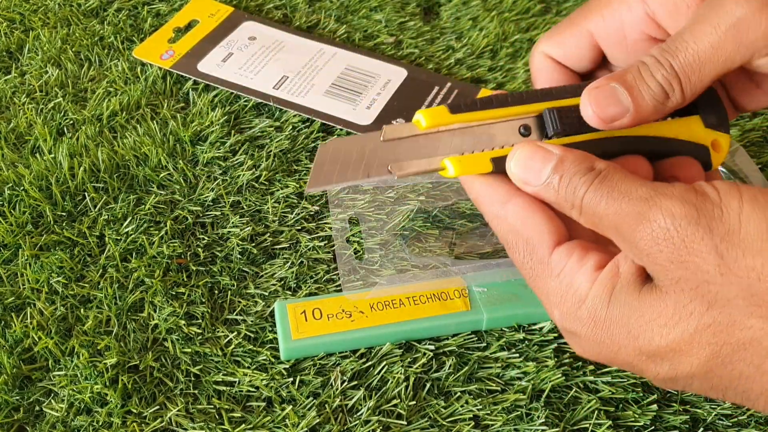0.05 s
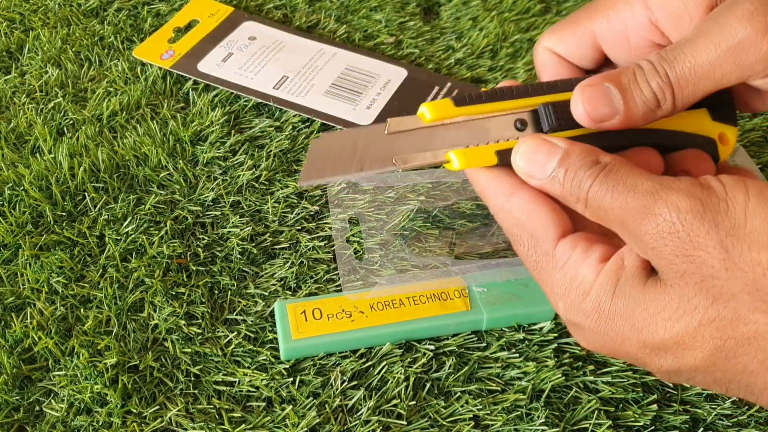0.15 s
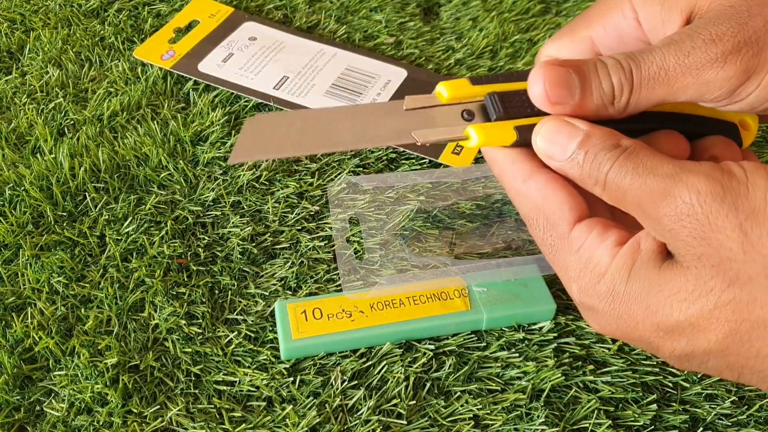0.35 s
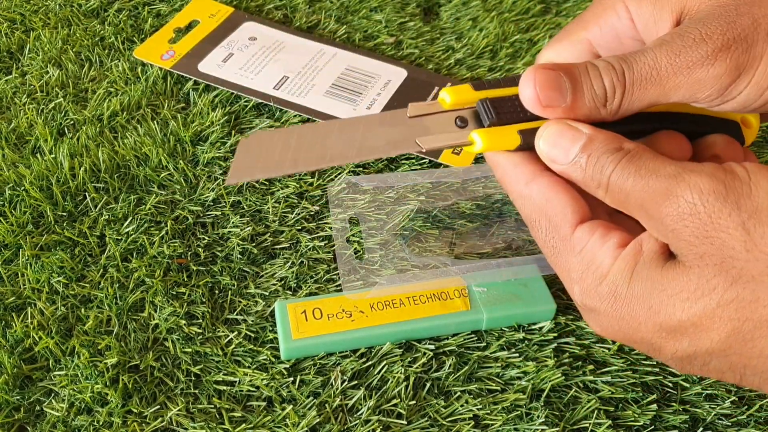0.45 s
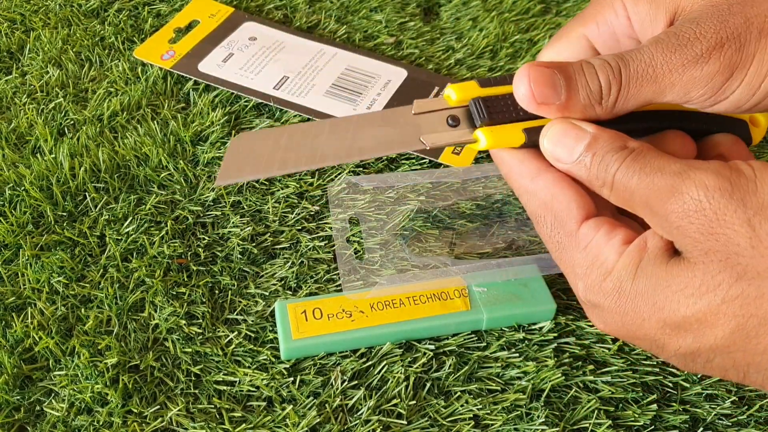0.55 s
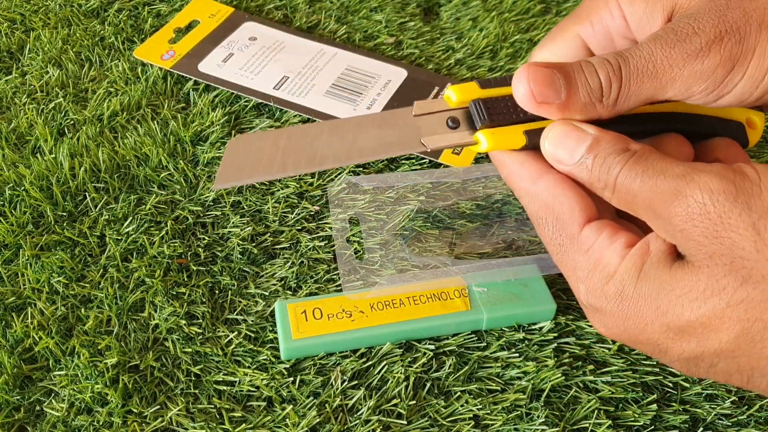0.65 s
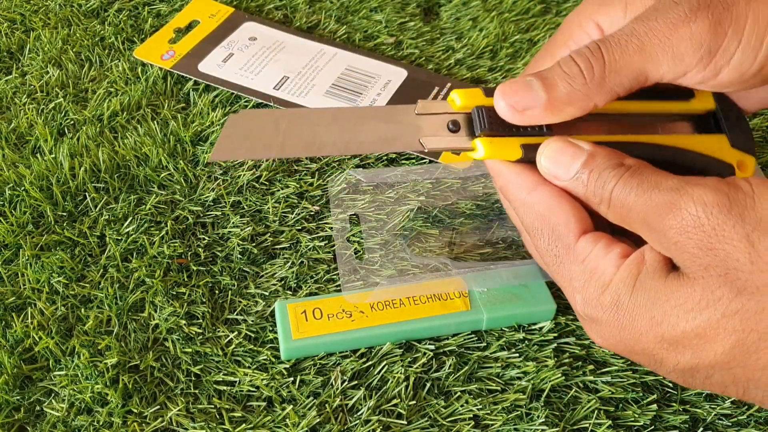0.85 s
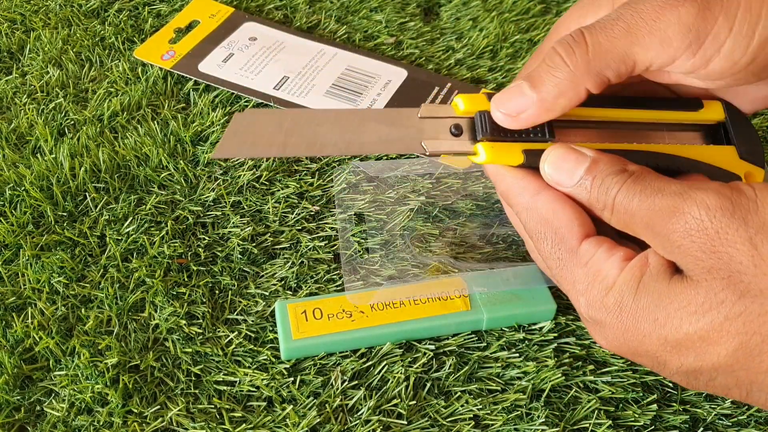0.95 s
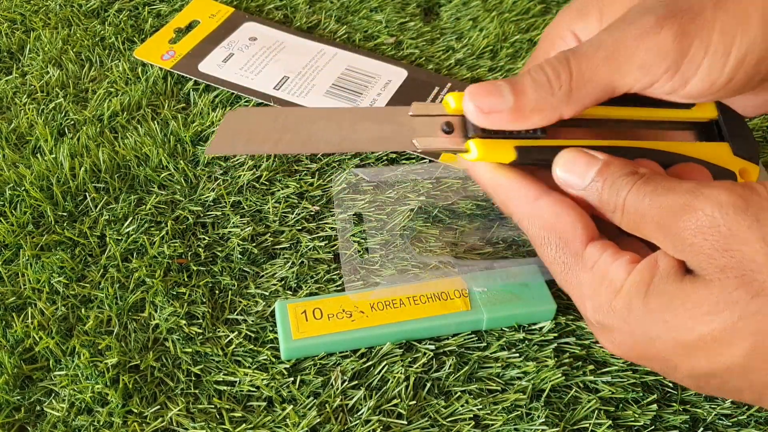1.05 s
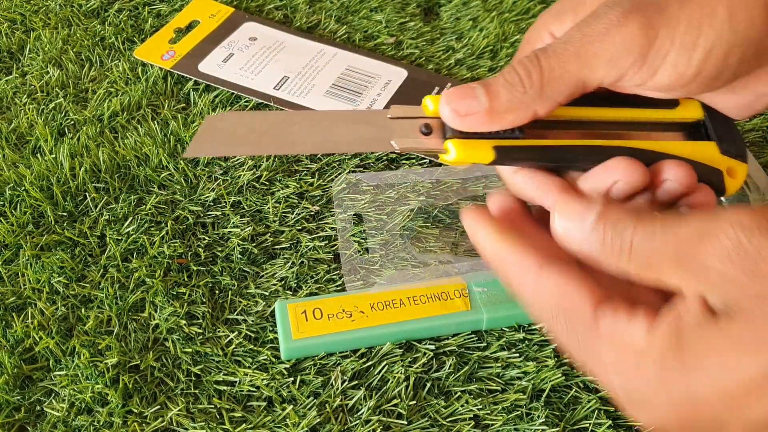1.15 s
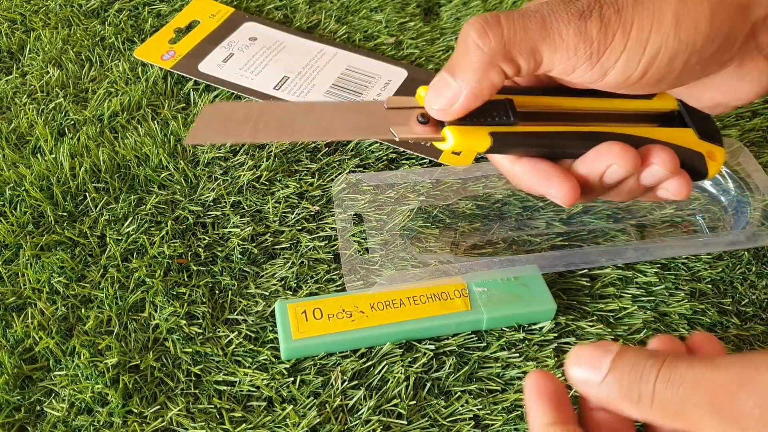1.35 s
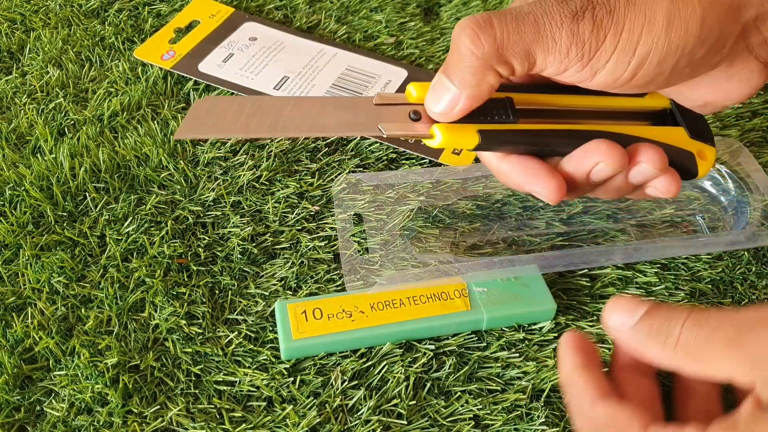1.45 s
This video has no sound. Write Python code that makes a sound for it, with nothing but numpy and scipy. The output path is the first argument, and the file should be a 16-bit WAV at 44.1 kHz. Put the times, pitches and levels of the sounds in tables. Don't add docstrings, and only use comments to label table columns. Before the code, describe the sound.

A utility knife is clicked open close to a small stereo microphone outdoors. After near quiet with a very faint falling bird whistle, ten bright metallic ratchet snaps run from 0.21 to 0.57 seconds, densest near 0.3, then spacing out, with thin blade scraping and hollow plastic knocks. Small rattles end by 0.62. Faint hand rustle and finger taps follow from 0.95, a distant hoot at 1.15, over low traffic rumble.

```python
import sys
import numpy as np
from scipy import signal
from scipy.fft import rfft, irfft, next_fast_len
from scipy.io import wavfile
from scipy.ndimage import uniform_filter1d, map_coordinates

SR = 44100
rng = np.random.default_rng(int(sys.argv[2]) if len(sys.argv) > 2 else 0)


def pcm_store(signal):
    levels = np.round(np.clip(np.atleast_2d(signal), -1, 1) * 32767)
    wavfile.write(sys.argv[1], SR, levels.astype(np.int16).T)


def gain_from_db(level_db):
    decades = np.asarray(level_db, float) / 20
    return 10 ** decades


N = 66150
T = np.arange(N) / SR
KNIFE_LAG_S = 0.000154
TOP_HZ = 16050


def unit(x):
    return x / np.sqrt(np.mean(x ** 2) + 1e-20)


def along(points, hz):
    f, v = np.transpose(points)
    return np.interp(np.log(hz + 1), np.log(f + 1), v)


def curves(rows):
    s, *cols = np.transpose(rows)
    return [np.interp(T, s, c) for c in cols]


def wobble(rate):
    return map_coordinates(rng.standard_normal(int(N * rate / SR) + 4), [T * rate])


def decay(since, t60):
    return (since >= 0) * gain_from_db(-60 * np.clip(since, 0, None) / t60)


def filtered(x, response):
    m = next_fast_len(N + SR // 2)
    return irfft(rfft(x, m) * response(np.fft.rfftfreq(m, 1 / SR)), m)[..., :N]


def lagged(x, lag_s):
    return filtered(x, lambda f: np.exp(-1j * np.pi * f * lag_s * np.array([[1], [-1]])))


def modes(table, f):
    total = 0
    for k, (centre, width, db) in enumerate(table):
        total = total + (-1) ** k * gain_from_db(db) * 1j * f * width / (centre ** 2 - f ** 2 + 1j * f * width)
    return total


def pair(own, spiky_db, rate):
    z = rng.standard_normal((3, N))
    return unit((z[0] + own * z[1:]) * gain_from_db(spiky_db * wobble(rate)))


def gain_patches(x, segment, size_hz, size_time, depth_db):
    z = signal.stft(x, nperseg=segment)[2]
    field = uniform_filter1d(rng.standard_normal(z.shape[1:]), size=size_hz, axis=0)
    field = uniform_filter1d(field, size=size_time, axis=1)
    return signal.istft(z * gain_from_db(depth_db * unit(field)), nperseg=segment)[1][:, :N]


# (frequency [Hz], width [Hz], level [dB])
BLADE_MODES = [(3250, 130, -6.5), (4300, 300, 11), (7360, 190, -7), (8912, 74, 16), (9890, 480, 3),
               (11220, 80, 12), (11950, 140, 1), (12830, 280, 12), (14060, 100, 8.5), (14160, 130, 7),
               (14050, 72, -5.5), (15400, 600, 15.5)]
# (frequency [Hz], left over right [dB])
KNIFE_BALANCE = [(1000, -6), (5000, -10), (8000, -8), (12000, 1.5), (16000, -8)]


def steel(x, colour, ring_db):
    side = np.array([[.5], [-.5]])
    shape = lambda f: gain_from_db(along(colour, f)) * (1 + gain_from_db(ring_db) * modes(BLADE_MODES, f))
    norm = np.sqrt(np.mean(abs(shape(np.linspace(0, SR / 2, num=4000))) ** 2))
    return filtered(x, lambda f: shape(f) / norm * gain_from_db(side * along(KNIFE_BALANCE, f)))


# (time [s], peak [dB], handle knock over it [dB], scrape after it [dB], contact [ms])
SNAPS_ON_TEETH = [
    (0.2114, -18.5, -21.5, -39, 1.58),
    (0.253, -16.5, -22, -33, 0.6),
    (0.2802, -11, -29, -39.5, 0.49),
    (0.2969, -14, -35.5, -44.5, 0.54),
    (0.3089, -17.5, -31, -46, 0.75),
    (0.3274, -15.5, -34.5, -40.5, 0.49),
    (0.3573, -11.5, -12, -36, 0.62),
    (0.3979, -14, -15.5, -48, 0.63),
    (0.4615, -12.5, -28.5, -42.5, 0.61),
    (0.5696, -13, -23, -39.5, 0.53),
]
# (frequency [Hz], level [dB])
SNAP_TONE = [(880, -44), (1500, -20.5), (5000, -9), (6110, -16.5), (7100, -13), (9220, -6), (12300, 2),
             (15400, -8), (16500, -26.5)]
# (frequency [Hz], width [Hz], level [dB])
HANDLE_MODES = [(1200, 350, -8.5), (1730, 200, 3.5), (2540, 260, -1.5)]


def snaps():
    steel_grit = pair(own=1, spiky_db=4.5, rate=2800)
    handle_grit = pair(own=0.28, spiky_db=-2, rate=5500)
    body = lambda f: modes(HANDLE_MODES, f) / (1 + (1000 / (f + 1)) ** 4)
    heard_steel = unit(lagged(steel(steel_grit, SNAP_TONE, ring_db=-9.5), KNIFE_LAG_S).sum(axis=0))
    heard_handle = unit(filtered(handle_grit[1], body))
    rattle, knock = np.zeros(N), np.zeros(N)
    for s, db, knock_db, _, ms in SNAPS_ON_TEETH:
        u = np.clip(T - s, 0, None) / (ms / 1000)
        burst = u ** 2 * np.exp(1.5 - 1.498 * u ** 0.96)
        even = lambda grit: np.linalg.norm(burst) / np.linalg.norm(burst * grit)
        lead_in = gain_from_db(-21) * decay(T - s + .003, t60=0.014)
        rattle += gain_from_db(db - 3.5) * (burst * even(heard_steel) + lead_in)
        knock += gain_from_db(db + knock_db + 12.5) * burst * even(heard_handle)
    blade = steel(rattle * steel_grit, SNAP_TONE, ring_db=-5.0)
    handle = filtered(knock * handle_grit, body) * gain_from_db([[-4], [4]])
    return lagged(blade + handle, KNIFE_LAG_S)


# (time [s], level [dB])
THUMB_PUSH = [(.178, -76.5), (.188, -56), (.21, -43), (.33, -42.5), (.44, -47), (.515, -52.5), (.54, -72),
              (.575, -48), (.625, -47), (.66, -74), (.7, -79)]
# (frequency [Hz], level [dB])
SCRAPE_TONE = [(530, -53.5), (900, -20), (1250, -9), (1600, -3.5), (2100, -8), (3920, -9.5), (7300, -15),
               (8660, -10.5), (11600, -6), (15500, -14), (16500, -32)]


def scrape():
    hold_s, t60_s, stick_db, stick_s = 0.0057, 0.16, -9, .006
    slide, rough_db = gain_from_db(curves(THUMB_PUSH)[0]), 1.0 * wobble(120)
    for s, _, _, scrape_db, _ in SNAPS_ON_TEETH:
        fall = gain_from_db(-60 * (T - s - hold_s).clip(-1, 1) / t60_s)
        slide = slide + gain_from_db(scrape_db) * (T > s) * np.minimum(1, fall)
        rough_db += stick_db * (T < s) * np.exp(-((T - s) / stick_s) ** 2)
    grit = pair(own=1, spiky_db=0.5, rate=2000)
    grain = unit(gain_patches(grit, segment=128, size_hz=3, size_time=6, depth_db=3.2))
    rub = slide * gain_from_db(rough_db) * grain
    early = 1 / (1 + np.exp(((T - .44) / 0.02).clip(-30, 30)))
    out = steel(rub * early, SCRAPE_TONE, ring_db=-3.0) + steel(rub * (1 - early), SCRAPE_TONE, ring_db=-2.5)
    return lagged(filtered(out, lambda f: 1 / (1 + (f / TOP_HZ) ** 120)), KNIFE_LAG_S)


# (time [s], level [dB], pitch [Hz])
HANDLE_THUMPS = [(.2131, -25, 1250), (.2133, -25, 1600), (.2536, -27, 1750), (.2812, -31, 1600),
                 (.3581, -16, 1650), (.3579, -33, 850), (.361, -27, 1700), (.399, -24, 1720),
                 (.4625, -33, 1150), (.5701, -28, 1450), (.596, -38, 1750)]


def thumps():
    out = np.zeros(N)
    for s, db, hz in HANDLE_THUMPS:
        t = np.clip(T - s, 0, None)
        swell = 1 - np.exp(-t / .0004)
        out += gain_from_db(db) * swell * decay(t, t60=.009) * np.sin(2 * np.pi * hz * t)
    out = filtered(out, lambda f: (1j * f / (700 + 1j * f)) ** 2)
    return lagged(out * gain_from_db([[-8], [0]]) * 2, KNIFE_LAG_S)


# (start [s], length [s], pitch
# [Hz], level [dB])
HELD_SINGS = [(.186, .024, 12600, -57), (.186, .024, 10000, -59), (.188, .02, 4900, -64),
              (.19, .02, 15000, -56), (.215, .029, 8930, -40), (.216, .033, 11250, -42),
              (.217, .025, 13000, -43), (.257, .019, 8900, -46), (.269, .011, 15200, -42),
              (.282, .016, 8900, -43), (.282, .02, 1640, -46), (.305, .03, 1560, -49),
              (.36, .03, 8950, -47), (.374, .022, 4000, -46), (.4, .045, 9040, -50)]


def singing():
    width_hz, edge_s = 110, 0.003
    out = np.zeros((2, N))
    for s, length, hz, db in HELD_SINGS:
        phase = 2 * np.pi * np.cumsum(hz + width_hz * wobble(300)) / SR
        tone = np.sqrt(2) * np.sin(phase + np.array([[0], [1]]) * wobble(60))
        ring = tone * gain_from_db([2.5 * wobble(400), 2.5 * wobble(400)])
        out += gain_from_db(db) * ring * np.clip(np.minimum(T - s, s + length - T) / edge_s, 0, 1)
    return out * gain_from_db([[-2], [2]])


def ticks(rows, contact_s, width):
    size = 2048
    out = np.zeros((2, N + size))
    u, f = T[:size] / contact_s, np.fft.rfftfreq(size, 1 / SR)
    push = u * np.exp(1 - u ** 2)
    for s, db, hz in rows:
        n = rng.standard_normal((3, size))
        contact = rfft((n[0] + .5 * n[1:]) * push)
        tick = irfft(contact * modes([(hz, hz * width, 0)], f) ** 2, size)
        start = round((s - contact_s) * SR)
        out[:, start:start + size] += gain_from_db(db) * tick / abs(tick).max() * gain_from_db([[-2.5], [2.5]])
    return out[:, :N]


# (time [s], level [dB], pitch [Hz])
RAIL_CATCHES = [(.173, -63, 6700), (.188, -53, 4970), (.2145, -29, 3100), (.2155, -24, 11500),
                (.2545, -23, 12000), (.254, -32, 3300), (.2815, -21, 7390), (.2988, -22, 12300),
                (.312, -31, 5500), (.312, -34, 3200), (.3278, -25, 13800), (.3595, -31, 3100),
                (.3625, -31, 3800), (.3995, -28, 4360), (.3998, -21, 13000), (.4055, -32, 12500),
                (.4635, -28, 4610), (.4635, -28, 6500), (.465, -24, 12500), (.479, -35, 13300),
                (.4895, -40, 4500), (.492, -39, 4100), (.514, -49, 4300), (.5706, -29, 2500),
                (.571, -29, 5010), (.5855, -37, 13300), (.591, -38, 4400), (.5945, -39, 4600),
                (.597, -38, 2100), (.601, -41, 4500), (.617, -37.5, 4500), (.617, -41, 15000),
                (.617, -48, 2000)]


def catches():
    return ticks(RAIL_CATCHES, contact_s=0.0022, width=.24)


# (time [s], level [dB], pitch [Hz])
FINGER_TAPS = [(1.03, -61.5, 1600), (1.103, -65, 4820), (1.104, -59.5, 1900), (1.144, -64.5, 10000),
               (1.255, -68.5, 4300), (1.35, -53.5, 2020), (1.362, -58.5, 2100), (1.362, -58, 4500),
               (1.362, -52.5, 8500), (1.39, -54, 2000), (1.464, -55.5, 5900), (1.464, -59.5, 3970),
               (1.464, -55, 10000), (1.493, -64.5, 5000)]


def taps():
    return ticks(FINGER_TAPS, contact_s=0.00191, width=.36)


def rush(spectrum, alike, patchy_db):
    two = gain_patches(rng.standard_normal((2, N)), segment=512, size_hz=6, size_time=10, depth_db=patchy_db)
    turn = lambda hz: np.arccos(np.clip(along(alike, hz), -1, 1)) / 2
    mid_side = lambda hz: gain_from_db(along(spectrum, hz)) * [np.cos(turn(hz)), np.sin(turn(hz))]
    mid, side = filtered(two, mid_side)
    return unit(np.array([mid + side, mid - side]))


# (time [s], level [dB])
FINGER_RUSTLE = [(0, -91), (.15, -81), (.7, -74.5), (.8, -90), (.89, -88.5), (.95, -67), (1, -79.5),
                 (1.2, -78.5), (1.26, -69), (1.33, -76.5), (1.365, -63.5), (1.41, -75.5), (1.5, -68.5)]
# (frequency [Hz], level [dB])
SKIN_TONE = [(1470, -12), (2500, 2), (3220, -12.5), (4450, 1), (6810, -4), (15100, 1), (16500, -16)]


def fingers():
    level = gain_from_db(curves(FINGER_RUSTLE)[0] + 1.3 * wobble(60))
    return filtered(level * rush(SKIN_TONE, [(3000, 0.24)], patchy_db=2.5), lambda f: f < TOP_HZ)


# (time [s], level [dB])
PALM_RUB = [
    (0, -71.5),
    (.19, -64),
    (.7, -73),
    (.9, -99),
    (1, -67.5),
    (1.3, -78),
    (1.5, -71),
]
# (frequency [Hz], level [dB])
PLASTIC_TONE = [(530, -33), (900, -7), (1180, -10), (1330, -5), (3200, -25), (4160, -57), (7040, -120)]


def palm():
    level = gain_from_db(curves(PALM_RUB)[0] + 1.6 * wobble(57))
    return level * rush(PLASTIC_TONE, [(2000, 0.083)], patchy_db=1.5)


# (time [s], pitch [Hz], level [dB])
BIRD_WHISTLE = [
    (.056, 5450, -100),
    (.064, 5300, -83),
    (.085, 4650, -81),
    (.105, 4000, -76),
    (.13, 3600, -75),
    (.17, 3250, -75),
    (.188, 3200, -80),
    (.2, 3200, -110),
]
# (time [s], pitch [Hz], level [dB])
BIRD_HOOT = [
    (1.138, 1370, -95),
    (1.146, 1370, -65),
    (1.2, 1345, -69),
    (1.26, 1310, -69),
    (1.275, 1300, -95),
]


def bird(rows, flutter_db):
    hz, db = curves(rows)
    phase = 2 * np.pi * np.cumsum(hz * (1 + 0.0175 * wobble(250))) / SR
    tone = gain_from_db(db + flutter_db * wobble(110)) * np.sin(phase)
    tail = rng.standard_normal((2, SR // 10)) * decay(T[:SR // 10], t60=.3)
    tail = gain_from_db(3) * tail / np.linalg.norm(tail[0])
    return tone + signal.fftconvolve(tone[None], tail, axes=1)[:, :N]


# (frequency [Hz], level [dB])
CITY_TONE = [(82, -57), (140, -27.5), (170, -6.5), (263, -2), (502, -13.5), (554, -13.5), (820, -15.5),
             (1340, -24.5), (4000, -49.5), (5200, -72), (8800, -120)]
# (frequency [Hz], likeness [0-1])
CITY_LIKENESS = [(150, 0.97), (300, 0.56), (600, 0.48), (1500, 0.53)]


def city():
    wash = lagged(rush(CITY_TONE, CITY_LIKENESS, patchy_db=1.27), lag_s=-0.00047)
    return gain_from_db(-57 + 1.0 * wobble(6.9)) * wash * gain_from_db([[-.9], [.9]])


# (frequency [Hz], level [dB])
RUMBLE_TONE = [(13, -38.5), (22, -9), (35, 2.5), (54, -3), (92, -5.5), (101, -11.5), (114, -16), (151, -23),
               (160, -32.5), (210, -53.5), (350, -120)]
# (frequency [Hz], likeness [0-1])
RUMBLE_LIKENESS = [(30, .965), (90, .975), (200, .8)]
# (frequency [Hz], width [Hz], level [dB])
ENGINE_HUMS = [(51, 11, -3), (83.6, 2.1, -1.5), (90.5, 12, -4.5)]


def traffic():
    hum = lambda f: 1 + gain_from_db(-1.5) * abs(modes(ENGINE_HUMS, f))
    low = filtered(rush(RUMBLE_TONE, RUMBLE_LIKENESS, patchy_db=1.06), hum)
    return gain_from_db(-47 + 0.4 * wobble(10)) * unit(low)


def background():
    birds = bird(BIRD_WHISTLE, flutter_db=3) + bird(BIRD_HOOT, flutter_db=2)
    soft = fingers() + palm() + birds + city() + traffic()
    return soft * gain_from_db(-10 * np.exp(-((T - .305) / 0.011) ** 2))


def scene():
    knife = snaps() + scrape() + thumps() + singing() + catches()
    return knife + taps() + background()


def low_pass(x):
    return signal.sosfilt(signal.butter(12, 17120, fs=SR, output="sos"), x)


def record(dry):
    mix = filtered(dry, lambda f: (f < 16900) / (1 + (43 / (f + 1)) ** 6))
    return low_pass(mix)


dry = scene()
out = record(dry)
pcm_store(out)
```